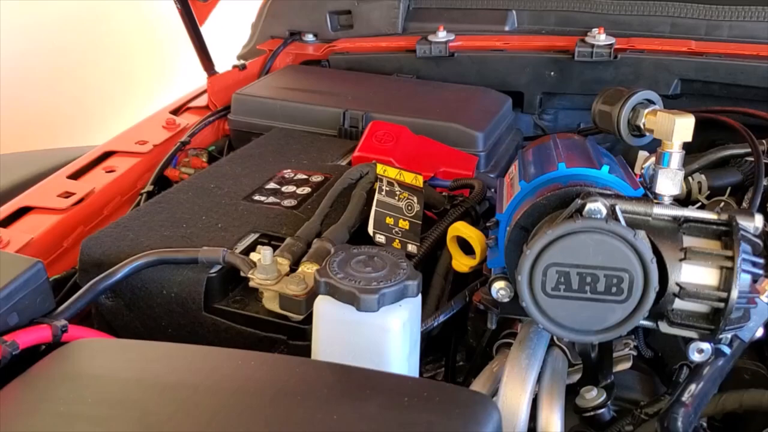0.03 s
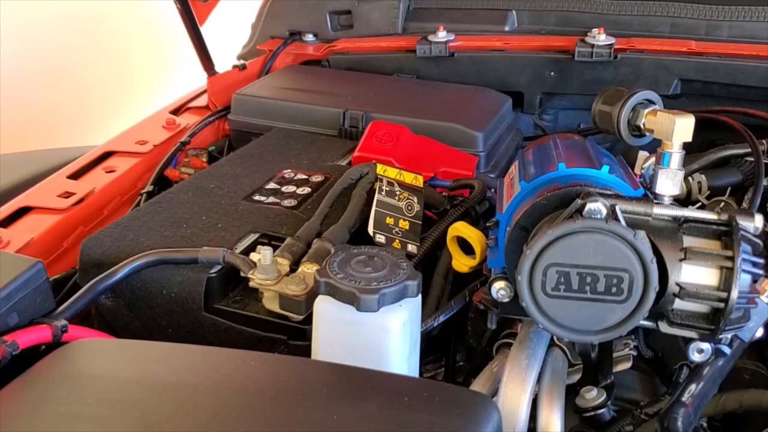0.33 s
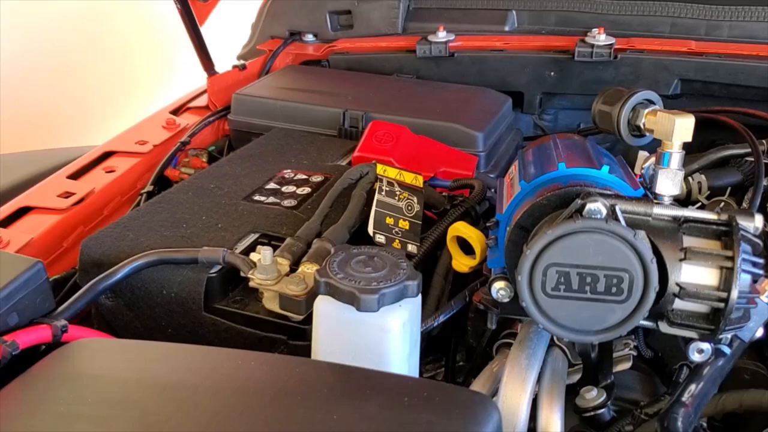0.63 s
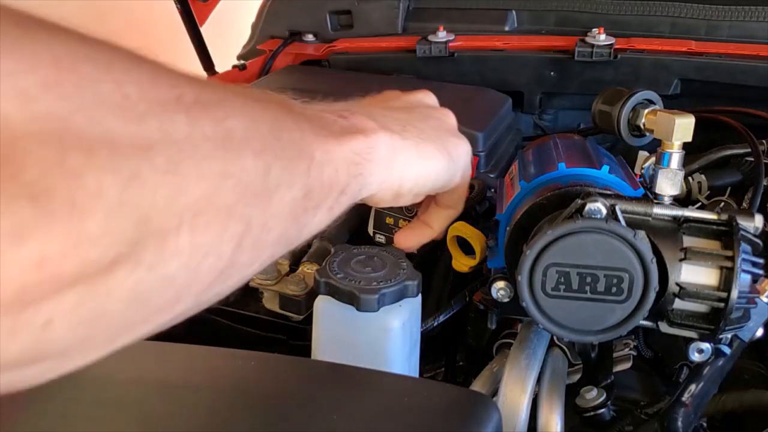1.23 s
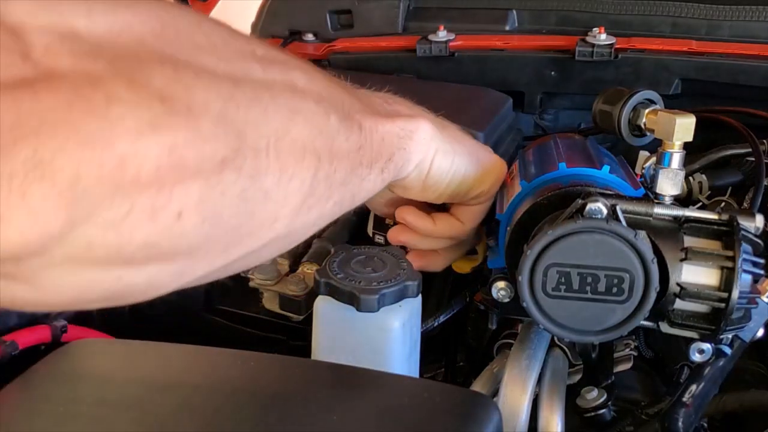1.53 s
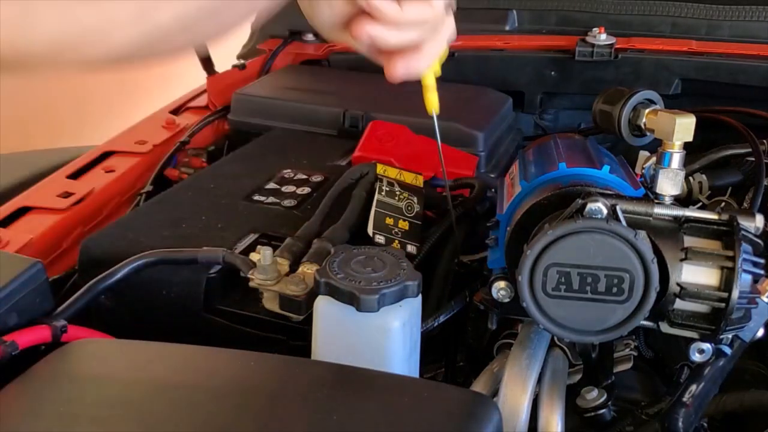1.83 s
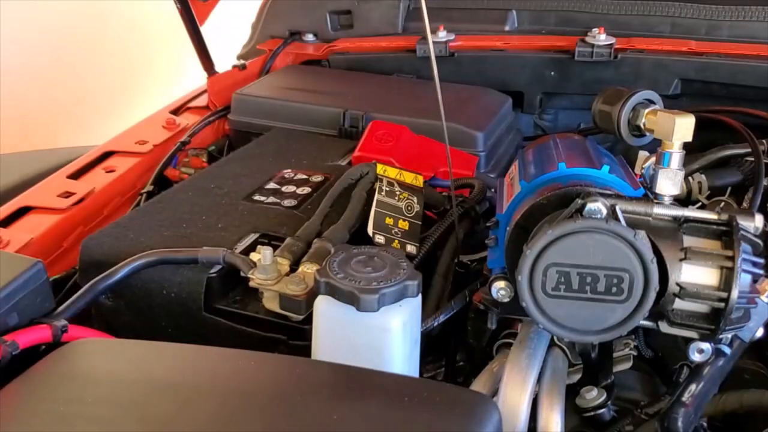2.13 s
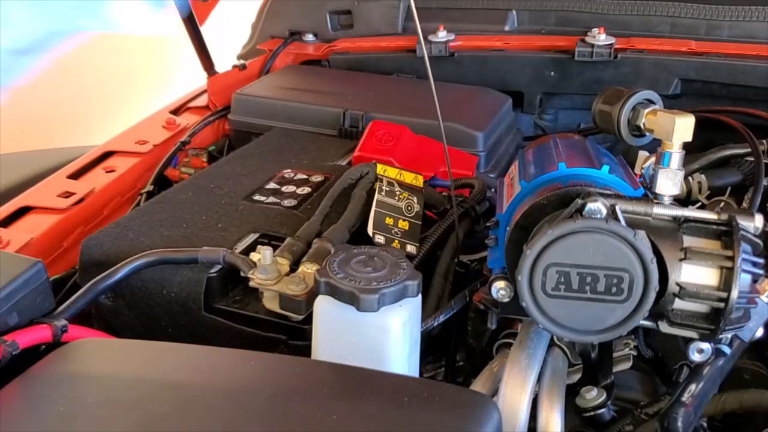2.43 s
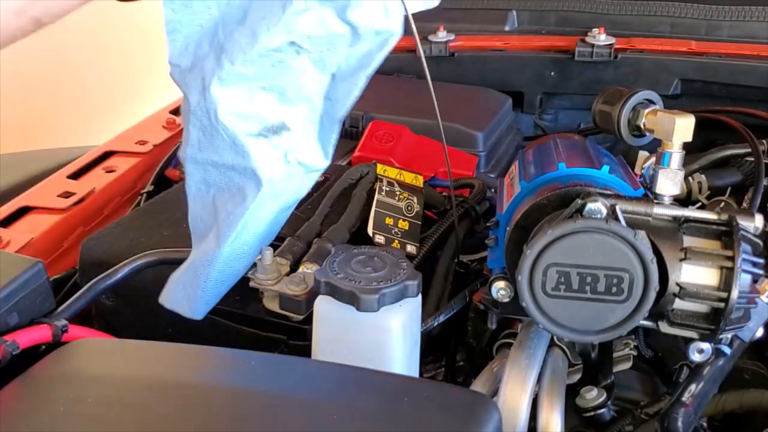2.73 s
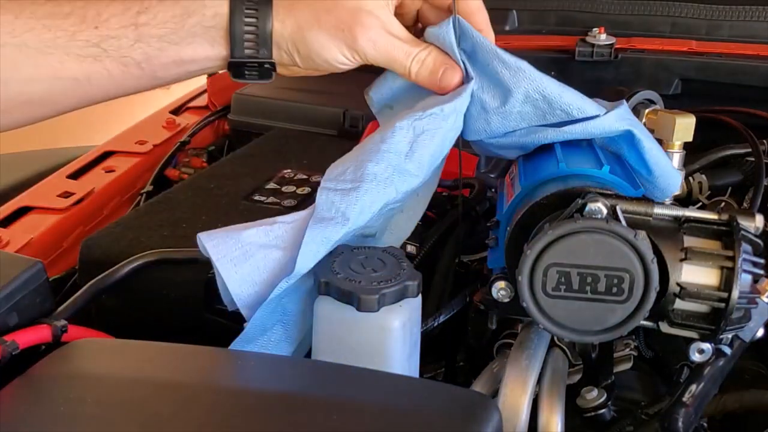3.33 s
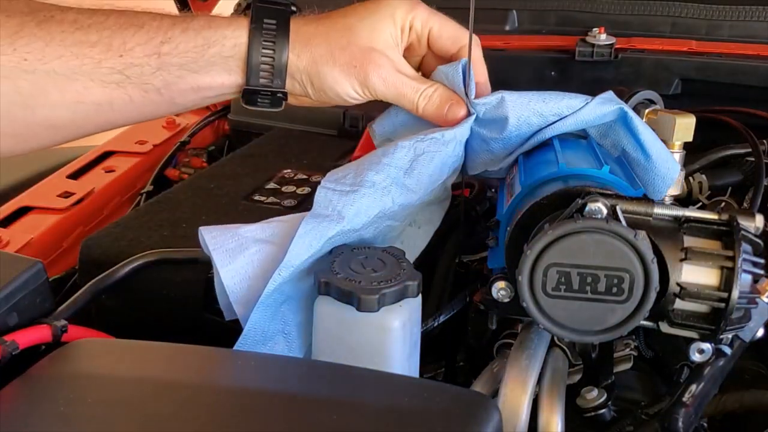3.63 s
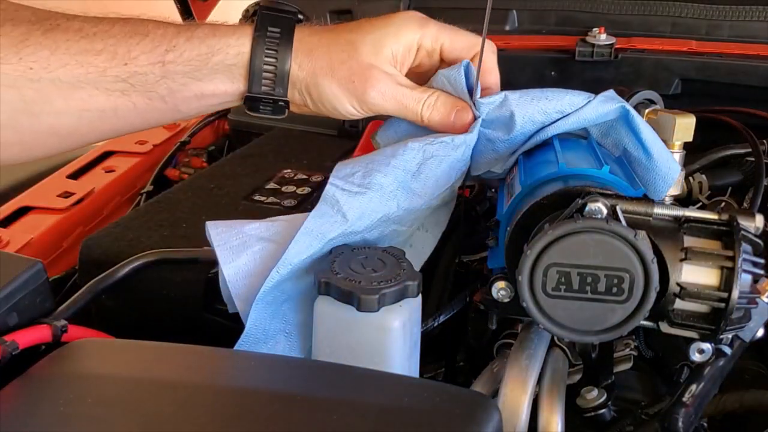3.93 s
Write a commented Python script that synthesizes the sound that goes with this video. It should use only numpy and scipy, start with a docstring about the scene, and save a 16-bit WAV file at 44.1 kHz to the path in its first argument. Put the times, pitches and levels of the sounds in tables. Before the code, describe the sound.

An oil dipstick is pulled out with a ringing scrape, followed by faint paper towel rustling.

```python
"""A steel oil dipstick scrapes up and out of its tube, close by, in an engine that is switched off.
Tiny friction slips make the blade rasp and ring. Just before, the hand bumps the plastic handle
twice and the plug lets go with a snap; afterwards the free blade sings faintly when rubbed.
A paper towel crinkles, and a soft hiss swells as arm and towel move.
Behind it all lie a low rumble, a faint hum and a thin microphone hiss."""
import sys
import numpy as np
from scipy import signal
from scipy.fft import rfft, irfft, next_fast_len
from scipy.io import wavfile
from scipy.ndimage import map_coordinates

SR = 44100
rng = np.random.default_rng(int(sys.argv[2]) if len(sys.argv) > 2 else 0)


def file_out(sig):
    """Save sig as 16-bit WAV at sys.argv[1]."""
    # one column per channel
    cols = np.atleast_2d(sig).T
    # limit, then scale
    lim = np.clip(cols, -1, 1)
    pcm = np.round(lim * 32767).astype(np.int16)
    wavfile.write(sys.argv[1], SR, pcm)


N = 176400

# The friction of the pull. Each row: time in seconds, level in dB.
PULL_LEVEL = [(1.69, -58), (1.73, -57), (1.76, -42), (1.768, -31.5), (1.786, -36), (1.797, -34),
              (1.822, -34), (1.852, -35), (1.928, -42.5), (2.0, -45.5), (2.045, -42.5), (2.08, -43.5),
              (2.11, -44), (2.14, -51), (2.19, -59), (2.258, -65), (2.334, -54), (2.468, -57.5), (2.6, -91)]
# The colour of the rasp. Each row: frequency in Hz, level in dB.
RASP_COLOUR = [(100, -13), (500, -5.5), (1300, -2.5), (2300, 1), (4000, -0.5), (5000, -1), (6200, -7.5),
               (7100, -5.5), (8000, -6), (11500, -2.5), (13000, -6), (15500, -8.5)]
# Narrow notches in the rasp. Each row: centre in Hz, width in Hz, depth in dB.
RASP_NOTCHES = [(1810, 55, 12), (2490, 70, 14), (2970, 40, 6), (7460, 130, 7)]
def blade_scrape(deep_s=1.76, free_s=2.3, contact_fade_s=0.04):
    """Dense tiny slips rasp and ring the steel, juddering more as the blade comes free."""
    t = clock()
    freedom = np.clip((t - deep_s) / (free_s - deep_s), 0, 1)
    inside_pull_s = np.minimum(t - PULL_LEVEL[0][0], PULL_LEVEL[-1][0] - t)
    contact = np.clip(inside_pull_s / contact_fade_s, 0, 1)
    slips = grains(per_s=19000) * amp(3 * rng.standard_normal((2, N)))  # uneven in strength
    slips = engine_bay(slips)
    chatter_db = 0.8 * wobble(per_s=130)
    judder_db = freedom * 1.3 * wobble(per_s=55)
    notch_db = lambda f: sum(db * np.exp(-((f - hz) / width) ** 2) for hz, width, db in RASP_NOTCHES)
    rasp = amp(-1) * unit(filtered(slips, lambda f: amp(along(RASP_COLOUR, f) - notch_db(f))))
    ring = amp(-16.5) * blade_ring(slips)
    return contact * amp(curve(PULL_LEVEL) + chatter_db + judder_db) * (rasp + ring)


# The ring of blade and tube. Each row: pitch in Hz, level in dB, peak time in seconds,
# half length of the glide's core in seconds, glide in Hz per second.
BLADE_MODES = [(1403, -5, 1.78, .03, -500), (1427, -1.5, 2.2, .06, 1), (1640, -4, 2.2, .07, 0),
               (1700, 4.5, 2.5, 0.074, -1), (2040, 3, 1.82, .05, -1200), (2100, 3, 2.1, .08, 0),
               (2250, 0.5, 1.775, .025, -1500), (2296, 0, 2.2, 0.045, -7), (2724, 2.5, 1.9, 0.069, -150),
               (3120, 4, 2.2, 0.052, -2), (3250, -5, 2.2, 0.032, 1), (4060, 2, 2.03, .06, -500),
               (4820, 5, 1.83, 0.045, -3500), (5440, 2, 1.9, .03, -2500), (8130, 4, 1.81, 0.02, 7)]
def blade_ring(slips, q=60, rest_db=-8):
    """Each mode swells as the contact passes its spot; most sink in pitch as the free length grows."""
    out = np.zeros((2, N))
    for hz, db, peak_s, half, glide in BLADE_MODES:
        ring = unit(filtered(slips, lambda f: resonance(f, hz, hz / q)))
        # Bend the pitch by varying the playing speed around the peak.
        speed = 1 + glide / hz * np.clip(clock() - peak_s, -2 * half, 2 * half)
        position = (np.cumsum(speed) - speed[:round(peak_s * SR)].sum() + peak_s * SR) % N
        gliding = np.array([np.interp(position, np.arange(N), side) for side in ring])
        swell_db = rest_db * (1 - swell(peak_s, 2 * half))
        out += gliding * amp(db + swell_db + 1.6 * wobble(per_s=22))
    return out


# The plug's release. Each row: start in seconds, level in dB, time to fall 60 dB in seconds.
PLUG_SNAPS = [(1.7629, -23.5, 0.033), (1.764, -28, 0.023)]
# The colour of the snap. Each row: frequency in Hz, level in dB.
SNAP_COLOUR = [(300, -25), (1500, -22), (4000, -6), (7400, 0), (8500, -3), (13000, 1.5), (15500, 2)]
def plug_snap():
    """The plug lets go in a bright, softly clipped burst."""
    burst = unit(np.tanh(noise(SNAP_COLOUR) / 1.5))
    return burst * sum(amp(db) * decay(clock() - start, t60) for start, db, t60 in PLUG_SNAPS)


# Two clusters of bumps. Each row: start in seconds, level in dB, contact time in seconds.
HANDLE_BUMPS = [(1.3454, -24, 0.00095), (1.3545, -27, 0.004), (1.4146, -24.3, 0.0009),
                (1.4196, -24.5, 0.0019), (1.444, -26, 0.0025)]
# The ring of handle and tube. Each row: pitch in Hz, level in dB, time to fall 60 dB in seconds.
HANDLE_MODES = [(182, -8, 0.17), (236, -3.5, 0.087), (341, -12.5, 0.096), (398.6, -10.5, 0.2),
                (435, -10, 0.13), (493, -0.5, 0.06), (559, -3.5, 0.1), (787, -19, 0.063), (860, -30, 0.037),
                (996, -10, 0.067), (1280, -23, 0.045), (1500, -23, 0.041)]
# The colour of the thud. Each row: frequency in Hz, level in dB.
THUD_COLOUR = [(60, -10), (200, 2.5), (500, -1), (1000, -1), (2000, -4), (4000, -10), (9000, -12)]
def handle_knocks(push_hz=464, right_lag_s=.00035):
    """The hand bumps the handle: a short push, a ring and a thud; a longer contact is duller."""
    out, size = np.zeros((2, N)), SR // 4
    t = np.maximum(np.arange(size) / SR - np.array([[0], [right_lag_s]]), 0)
    dull_noise = noise(THUD_COLOUR)
    for start, db, contact_s in HANDLE_BUMPS:
        span = slice(round(start * SR), round(start * SR) + size)
        ring = sum(amp(level + rng.normal(0, 1, (2, 1))) * np.sin(2 * np.pi * hz * t) * decay(t, t60)
                   for hz, level, t60 in HANDLE_MODES)
        push = amp(4.5) * np.sin(2 * np.pi * push_hz * t) * decay(t, t60=0.0095)
        thud = amp(-2.5) * dull_noise[:, span] * decay(t, t60=.11)
        attack = 1 - np.exp(-(t / contact_s) ** 2)
        blow = np.zeros((2, N))
        blow[:, span] = (ring + push + thud) * attack
        out += amp(db) * filtered(blow, lambda hz: 1 / (1 + (hz * contact_s) ** 2))
    return out * amp([[0], [-1]])  # softer on the right


# Wipes on the free blade. Each row: peak time in seconds, level in dB, half length in seconds,
# pitch in Hz.
BLADE_WIPES = [(2.297, -57, 0.06, 2190), (2.385, -64, 0.038, 4050), (3.373, -66, 0.1, 2120)]
def blade_wipes(width_hz=140):
    """Each light wipe makes one resonance of the blade sing faintly."""
    song = lambda hz: unit(filtered(rng.standard_normal((2, N)), lambda f: resonance(f, hz, width_hz)))
    return sum(amp(db) * swell(peak_s, half) * song(hz) for peak_s, db, half, hz in BLADE_WIPES)


# Light touches. Each row: peak time in seconds, level in dB, half length in seconds, centre in Hz.
LIGHT_RUBS = [(1.249, -57, 0.015, 2400), (1.465, -51.5, 0.023, 1060), (1.456, -53.5, 0.014, 3550),
              (1.775, -46, 0.0038, 2060), (2.036, -42.5, 0.028, 357), (2.97, -58.5, 0.021, 2200),
              (3.85, -62, 0.045, 3420)]
def light_rubs(width_octaves=.55):
    """Arm, hand and blade brush briefly, each touch a soft band of noise."""
    out = np.zeros((2, N))
    for peak_s, db, half, centre in LIGHT_RUBS:
        band = lambda hz: np.exp(-.5 * (np.log2((hz + 1) / centre) / width_octaves) ** 2)
        brush = unit(filtered(rng.standard_normal((2, N)), band))
        out += amp(db) * brush * swell(peak_s, half)
    return out


# The towel's rustles. Each row: peak time in seconds, level in dB, half length in seconds.
TOWEL_RUSTLES = [(.28, -55, 0.041), (.778, -54, .022), (.86, -57, 0.069), (1.085, -55.5, 0.074),
                 (2.905, -59, .025), (2.98, -63, .05)]
# The colour of the paper. Each row: frequency in Hz, level in dB.
PAPER_COLOUR = [(1500, -26), (4000, -2), (7400, -6), (9000, 0), (14000, 0), (15500, 2)]
def paper_towel():
    """The paper towel crinkles in bright clouds of tiny grains."""
    crinkles = engine_bay(grains(per_s=3500))
    paper = unit(filtered(crinkles, lambda hz: amp(along(PAPER_COLOUR, hz))))
    return paper * sum(amp(db) * swell(peak_s, half) for peak_s, db, half in TOWEL_RUSTLES)


# The rise and fall of the soft hiss. Each row: time in seconds, level in dB.
MOVEMENT_LEVEL = [(.1, -56.5), (.2, -62), (.28, -57), (.36, -63), (.55, -61), (.72, -56.5), (.78, -57),
                  (.9, -58), (1.1, -56), (1.3, -59.5), (1.55, -63.5), (1.72, -63.5), (2.15, -57.5),
                  (2.45, -54.5), (2.65, -57.5), (2.83, -56.5), (2.92, -52.5), (3.08, -56.5), (3.42, -57),
                  (3.7, -64), (3.85, -62), (4, -62)]
# Its colour. Each row: frequency in Hz, level in dB.
MOVEMENT_COLOUR = [(300, -14), (1500, 4.5), (3500, 3.5), (6000, -2), (7400, -5.5), (8500, -1), (15500, -3)]
def movement_hiss():
    """A soft hiss swells and ebbs as arm and towel move."""
    return amp(curve(MOVEMENT_LEVEL)) * noise(MOVEMENT_COLOUR)


def engine_bay(x, t60=.07, wet_share=.3):
    """Close metal and plastic walls add a dense, very short echo, different on each side."""
    t = np.arange(SR // 10) / SR
    tail = rng.standard_normal((2, len(t))) * decay(t, t60)
    wet = signal.fftconvolve(x, tail / np.linalg.norm(tail[0]), axes=1)[:, :N]
    return np.sqrt(1 - wet_share) * x + np.sqrt(wet_share) * wet


# The colour of the rumble. Each row: frequency in Hz, level in dB.
RUMBLE_COLOUR = [(20, -21), (40, -12), (54, -2), (78, 4), (100, -6.5), (140, -10.5), (200, -14.5),
                 (280, -18.5), (305, -21.5), (345, -16.5), (430, -23.5), (490, -25), (570, -22), (660, -27),
                 (1000, -26), (1300, -30.5), (2000, -38), (3500, -55), (7000, -69), (15000, -84)]
# The heave of its bass. Each row: time in seconds, gain in dB.
BASS_GAIN = [(.1, -3.5), (.22, 3), (.4, -3), (.75, -5), (.97, 5.5), (1.1, -0.5), (1.25, -1), (1.4, -0.5),
             (1.52, -12.5), (1.7, -3), (1.9, 3.5), (2.2, -4), (2.42, -0.5), (2.9, -5), (3.2, 2.5),
             (3.5, -1), (4, -5.5)]
def room_rumble(bass_hz=130):
    """A low rumble whose bass heaves and wavers."""
    rumble = amp(-40.5) * noise(RUMBLE_COLOUR)
    bass = filtered(rumble, lambda hz: 1 / (1 + (hz / bass_hz) ** 4))
    heave = amp(curve(BASS_GAIN) + 0.95 * wobble(per_s=4.74))
    return rumble + bass * (heave - 1)


# The tones of the hum. Each row: pitch in Hz, level in dB.
HUM_TONES = [(59.2, -50.5), (119, -50), (231.5, -55.5), (921, -70.5), (1039, -69.5)]
def hum():
    """Faint tones, each wavering in level and drifting in phase."""
    out = np.zeros(N)
    for hz, db in HUM_TONES:
        level = amp(db + wobble(per_s=4.053)) * np.sqrt(2)
        out += level * np.sin(2 * np.pi * hz * clock() + wobble(per_s=2.994))
    return out


# The level of the thin hiss. Each row: time in seconds, level in dB.
MIC_HISS_LEVEL = [(0, -62.5), (3.4, -62), (3.7, -65.5)]
# Its colour. Each row: frequency in Hz, level in dB.
MIC_HISS_COLOUR = [(3000, -20), (7400, -71), (8200, -32.5), (9700, -10), (10500, 0.5), (11250, 2.5),
                   (11800, -27), (15500, -17)]
def microphone_hiss():
    """The microphone's own thin, high hiss, easing near the end."""
    return amp(curve(MIC_HISS_LEVEL)) * noise(MIC_HISS_COLOUR)


# The stereo width of the noise. Each row: frequency in Hz, left-right correlation from -1 to 1.
STEREO_LIKENESS = [(60, 1), (130, 0.9), (290, 0.83), (640, 0.36), (1400, -0.12), (3000, 0.039)]
def noise(colour):
    """Coloured stereo noise of rms 1, centred in the bass and wide in the treble."""
    def mid_side_gains(hz):
        angle = np.arccos(np.clip(along(STEREO_LIKENESS, hz), -1, 1)) / 2
        return amp(along(colour, hz)) * [np.cos(angle), np.sin(angle)]
    mid, side = filtered(rng.standard_normal((2, N)), mid_side_gains)
    return unit(np.array([mid + side, mid - side]))


def grains(per_s):
    """Stereo clicks of random timing and strength."""
    return (rng.random((2, N)) < per_s / SR) * rng.standard_normal((2, N))


def amp(db):
    """Decibels to gain."""
    return 10 ** (np.asarray(db) / 20)


def unit(x):
    """Scale to rms 1."""
    return x / np.sqrt(np.mean(x ** 2) + 1e-20)


def clock():
    """Time of each sample in seconds."""
    return np.arange(N) / SR


def curve(rows):
    """Join (seconds, value) rows into one value per sample."""
    return np.interp(clock(), *np.transpose(rows))


def along(rows, hz):
    """Read (Hz, value) rows at hz, on a log axis."""
    frequencies, values = np.transpose(rows)
    return np.interp(np.log(hz + 1), np.log(frequencies + 1), values)


def wobble(per_s):
    """A smooth curve through per_s random points a second."""
    return map_coordinates(rng.standard_normal(int(N * per_s / SR) + 4), [clock() * per_s])


def swell(peak_s, half):
    """A bell-shaped swell, about 4 dB down at half seconds either side of its peak."""
    return np.exp(-.5 * ((clock() - peak_s) / half) ** 2)


def decay(t, t60):
    """Starts at t = 0 and falls 60 dB every t60 seconds."""
    return (t >= 0) * amp(-60 * np.maximum(t, 0) / t60)


def resonance(f, centre, width):
    """Band-pass response of one resonance, all in Hz."""
    return 1j * f * width / (centre ** 2 - f * f + 1j * f * width)


def filtered(x, response):
    """Shape x with a gain that depends on frequency."""
    size = next_fast_len(N + SR // 2)
    return irfft(rfft(x, size) * response(np.fft.rfftfreq(size, 1 / SR)), size)[..., :N]


# The lean to the left. Each row: frequency in Hz, left over right in dB.
LEFT_LEAN = [(100, 0.5), (400, 1), (2000, 1.9), (15000, 4)]
def scene():
    """Dipstick and handling over the background, all a little louder on the left."""
    background = room_rumble() + hum() + movement_hiss() + microphone_hiss()
    dipstick = handle_knocks() + blade_scrape() + plug_snap()
    handling = light_rubs() + blade_wipes() + paper_towel()
    lean = lambda hz: amp(along(LEFT_LEAN, hz) * np.array([[.5], [-.5]]))
    return filtered(dipstick + handling + background, lean)


def record(dry, start_s=0.077, fade_s=0.041, top_hz=15800):
    """Fade the sound in quickly and cut the very top of the treble."""
    fade = np.clip((clock() - start_s) / fade_s, 0, 1) ** 2
    return filtered(dry * fade, lambda hz: hz < top_hz)


dry = scene()
out = record(dry)
file_out(out)
```